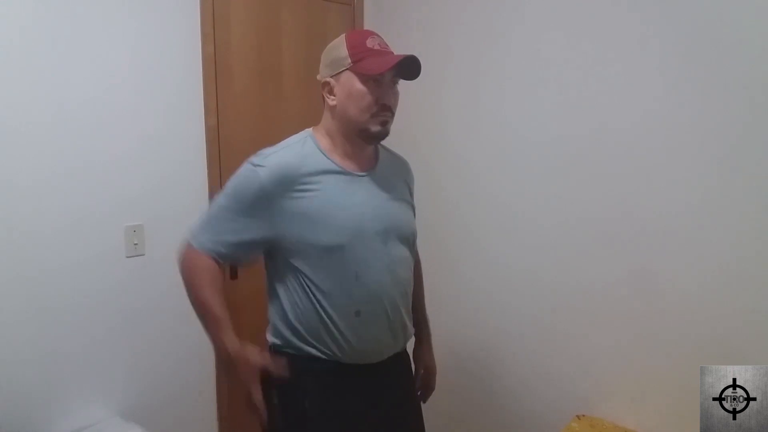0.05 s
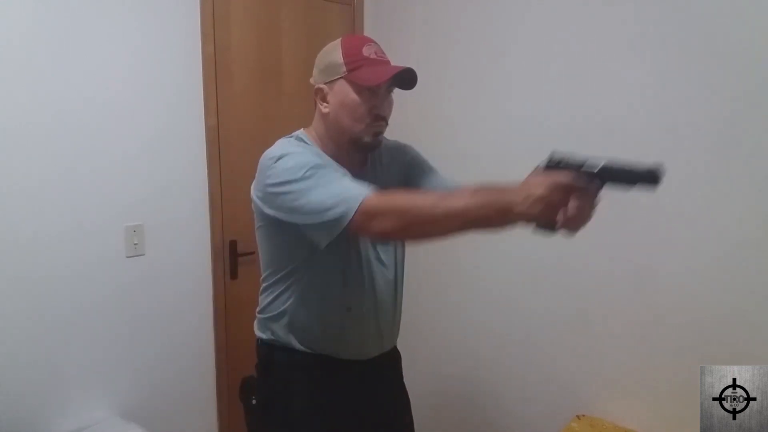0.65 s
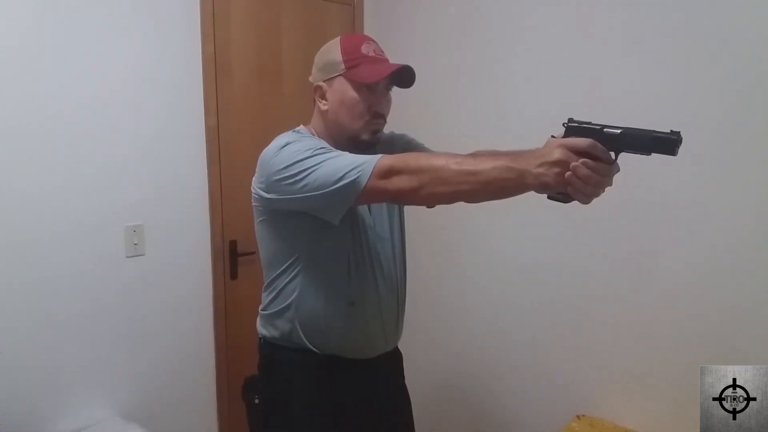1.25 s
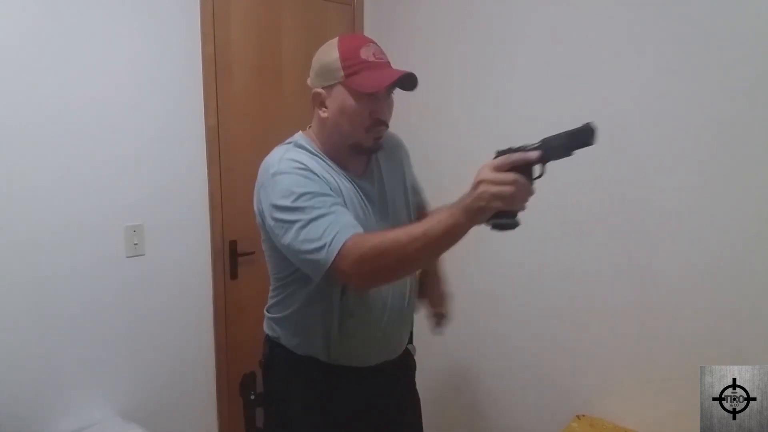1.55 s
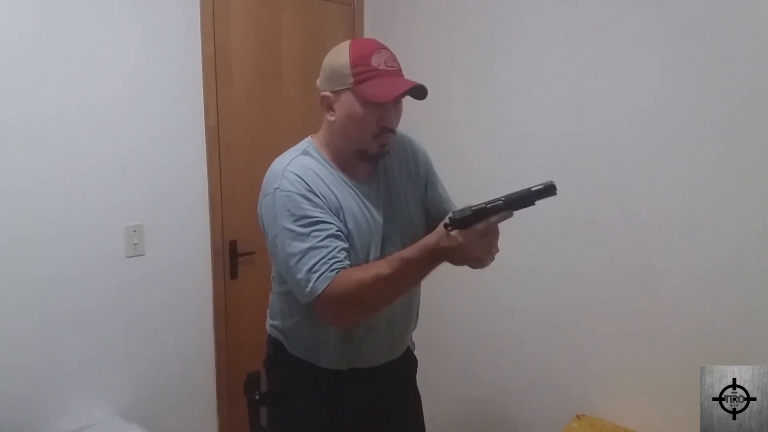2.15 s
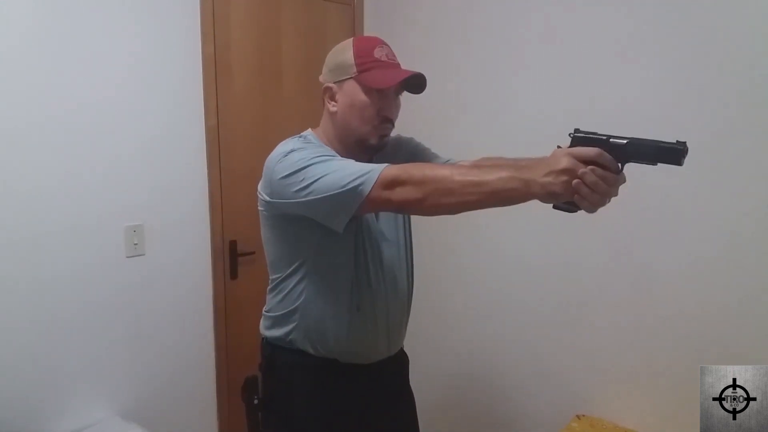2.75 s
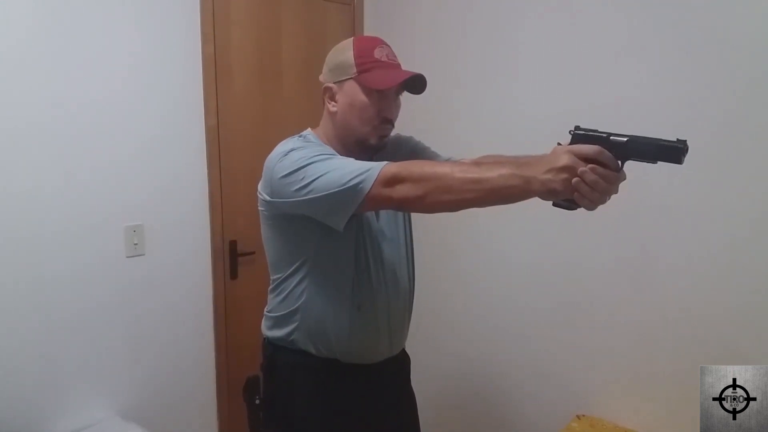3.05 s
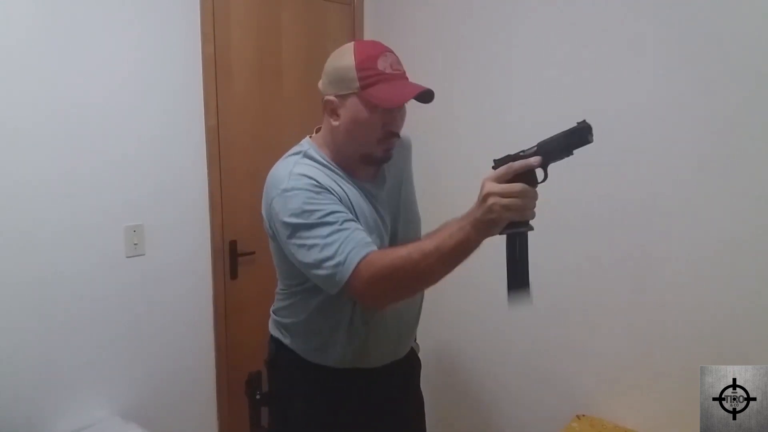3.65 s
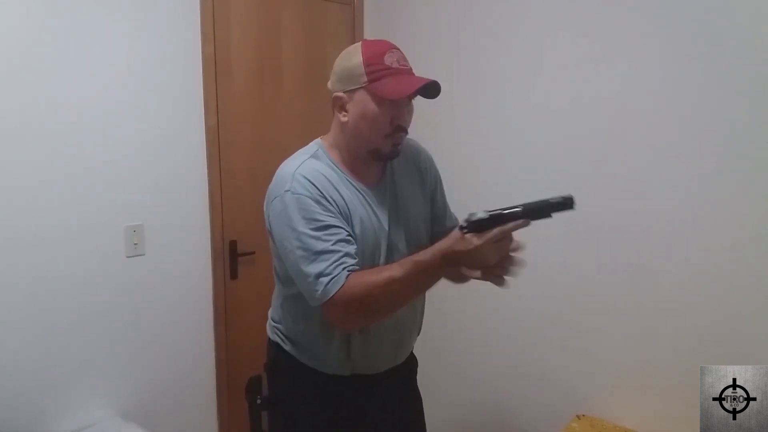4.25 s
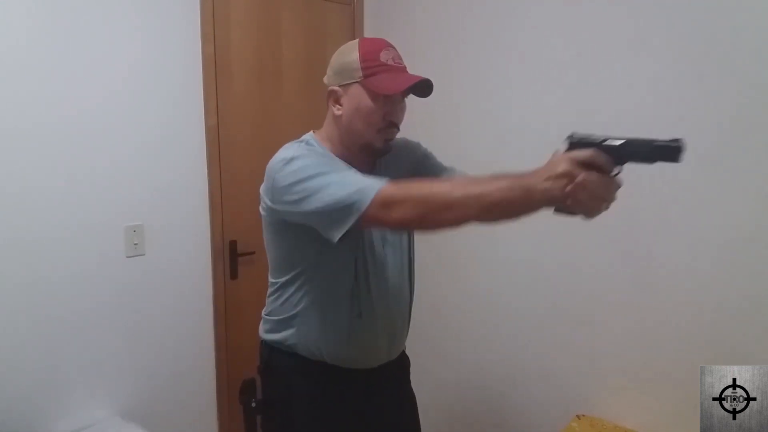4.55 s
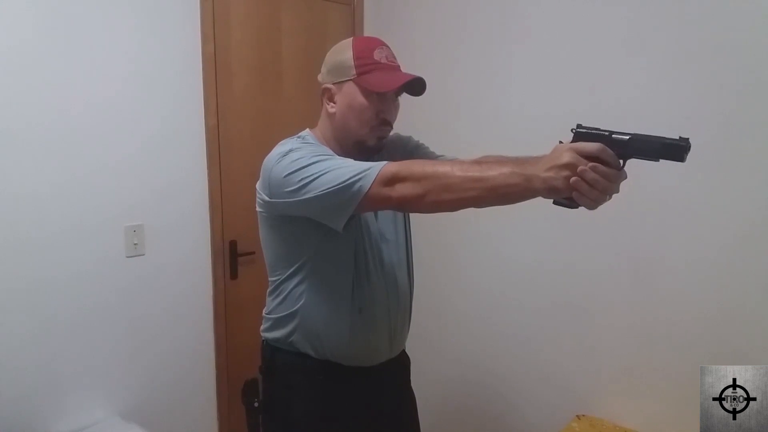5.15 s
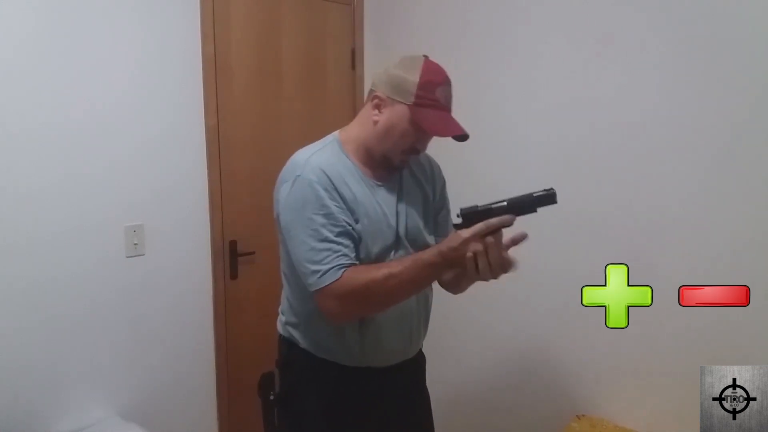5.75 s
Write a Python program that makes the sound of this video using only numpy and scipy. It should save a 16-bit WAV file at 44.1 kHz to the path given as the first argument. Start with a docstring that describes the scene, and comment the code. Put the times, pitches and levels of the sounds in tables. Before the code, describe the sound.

A pistol is drawn, clicks on an empty chamber and is reloaded twice with sharp metal clacks in a small room.

```python
"""Reload drills with an empty pistol in a small bare room. Over a wavering low hum that slowly fades,
cloth rustles, the pistol leaves its holster and the hammer snaps on an empty chamber. The catch clicks,
a fresh magazine is tugged from its pouch, the old one lands with a thump and a rattle, and the fresh one
scrapes in and is slapped home. A second reload follows, then one last sharp clack.
Every steel contact rings the struck part, a faint spring and the walls."""
import sys
import numpy as np
from scipy import signal
from scipy.fft import rfft, irfft, next_fast_len
from scipy.io import wavfile
from scipy.ndimage import map_coordinates

SR = 44100
rng = np.random.default_rng(int(sys.argv[2]) if len(sys.argv) > 2 else 0)


def persist_wave(psi):
    """Save psi, clipped to +-1, as 16-bit WAV."""
    counts = np.round(np.clip(psi, -1, 1) * 32767).astype(np.int16)
    wavfile.write(sys.argv[1], SR, np.atleast_2d(counts).T)


N = 256342

# Steel hits, levels relative within each layer: start_s, level_db, pitch_hz, heft_db, snap_db
HAMMER_HITS = [(1.138, -26.5, 4250, 0.5, 0)]  # the hammer falling
FRAME_HITS = [(0.153, -61, 3200, 1, -15), (0.298, -50, 3800, -2, -4), (0.333, -47, 900, -1.5, -2),
              (0.689, -71, 3320, 5, -7), (1.627, -55, 3600, 4.5, -12), (1.638, -40.5, 2340, -5, -12),
              (3.406, -77, 2030, -3.5, -10), (3.544, -60, 2100, -11.5, -17), (3.611, -36, 3080, -8.5, -6.5)]  # holster, grip and magazine catch
POUCH_HITS = [(1.82, -43.5, 2950, 3, -21.5), (1.881, -45.5, 4300, -3, -21.5),
              (3.795, -48, 2020, 5.5, -16.5), (3.818, -45.5, 3470, -1.5, -25)]  # a fresh magazine tugged free
DROP_HITS = [(2.012, -39.5, 1203, 0.5, -12), (2.021, -31.5, 2640, -2.5, -5.5), (2.037, -27.5, 3583, -2, 0),
             (2.132, -32, 3200, 6, -11.5), (2.144, -24.5, 1184, 4, -6), (3.982, -39.5, 2020, 5.5, -1.5),
             (3.996, -34, 3060, -11.5, -5), (4.013, -26.5, 3800, -3, 3), (4.05, -22, 2500, 5, -11)]  # the old one landing and bouncing
SEATING_HITS = [(2.27, -36.5, 1100, 1.5, -22), (2.29, -35, 1580, 2.5, -4.5), (2.303, -24, 3490, -8, -4),
                (2.315, -13.5, 1900, -12.5, -8.5), (2.332, -17.5, 1750, -11, -12),
                (2.375, -40, 1918, -3.5, -19), (4.194, -28, 3120, 2.5, -15), (4.21, -29.5, 2720, -30, -8),
                (4.298, -28.5, 2670, -0.5, -13), (4.339, -31, 950, 3, -13), (4.356, -25, 1710, 6, -7),
                (4.376, -22, 2900, -4, -2), (5.759, -21, 2300, -8, -13.5)]  # the fresh one going home, and the last clack
# Soft landings and palm blows: start_s, level_db
THUMP_HITS = [(2.003, -20.5), (2.124, -35.5), (2.369, -41.5), (3.99, -20.5), (4.353, -32), (4.386, -32.5)]
# Sustained movements: start_s, length_s, level_db
SCRAPE_STROKES = [(1.862, 0.018, -31), (2.15, .16, -32), (4.187, .205, -27.5)]  # a magazine along the pouch or up the grip
ARM_STROKES = [(0, 0.12, -64.5), (.19, 0.18, -57), (.5, 0.14, -59.5), (.7, 0.99, -66.5), (3.36, .55, -67.5),
               (5.26, 0.7, -72.5)]  # reach, draw, aim and reload
# Ring of each part: pitch_hz, width_hz, gain_db
SLIDE_MODES = [(875, 15, 0), (1400, 19, -1), (1712, 32, -12), (2494, 72, -1), (3120, 81, -6.5),
               (3680, 240, -8.5), (4200, 95, -8.5), (4850, 230, -10.5), (5480, 370, -10)]  # the slide under the hammer
FRAME_MODES = [(780, 120, -0.5), (1798, 66, 1), (2370, 115, -2.5), (3170, 23, -2), (3443, 52, -8.5),
               (4470, 41, -25)]  # the frame at the catch
MAGAZINE_MODES = [(921, 47, -7.5), (2020, 42, 0), (2330, 25, 3), (3210, 220, -5), (3800, 210, -4),
                  (4040, 41, -4.5), (4330, 39, -7), (4380, 47, -10)]  # a loose magazine
GRIP_MODES = [(664, 100, -2), (1680, 77, -7), (2135, 16, -8.5), (2484, 46, -2.5), (2760, 49, -11),
              (2984, 78, -8.5), (3550, 64, -6), (3420, 78, -7.5), (4700, 65, -20)]  # the grip with a magazine in it
# Tone curves: frequency_hz, gain_db
STEEL_EQ = [(60, -26.5), (200, 2.5), (450, 7.5), (750, 8), (1500, 7.5), (3000, 3.5), (4800, 3), (6000, -3),
            (7500, -15), (10000, -3.5), (13000, 0), (16000, -6)]  # steel on steel
BOOM_EQ = [(25, -36), (45, -5), (68, -5), (85, 3), (110, -7.5), (170, -11.5), (260, -23), (500, -26.5),
           (1200, -74.5)]  # the room's bass
AIR_EQ = [(15, -50), (25, -0.5), (38, -18.5), (70, -1.5), (137, -4), (166, -0.5), (195, -3.5), (416, -15.5),
          (463, -20.5), (545, -15), (1650, -24), (1940, -24), (2760, -26.5), (7110, -42), (16000, -31.5)]  # steady room tone
PAT_EQ = [(100, -12.5), (220, -6), (420, 7.5), (700, -20), (2000, -47)]
SCRAPE_EQ = [(100, -31.5), (450, -8), (850, 3.5), (1500, 0), (3200, 3), (5000, -12.5), (7700, -33),
             (12000, -22), (16000, -23.5)]
CLOTH_EQ = [(100, -20), (400, 3), (900, 1.5), (2100, 0), (4000, -10), (7000, -34), (16000, -30)]
BODY_EQ = [(35, -31), (65, 9), (110, -7), (300, -28), (1000, -85)]
MURK_EQ = [(30, -56.5), (60, -8), (150, -1), (230, -6.5), (400, -19), (1000, -51.5)]
# Reverb time of the bare walls: frequency_hz, t60_s
WALL_DECAY = [(100, .55), (500, .42), (1500, 0.41), (3500, 0.45), (6000, 0.4), (11000, 0.36), (16000, 0.26)]
# Tones of the hum: pitch_hz, gain_db
HUM_TONES = [(68, 3), (172, -1)]

CRACK_S, RATTLE_S = 0.0065, 0.013  # chatter decay of a locked part and of a loose one
FOCUS_DB, FOCUS_OCTAVES = 5, 0.36  # base lift and width of the bell around a hit's pitch
LIGHT_BELOW_DB, LIGHT_DB_PER_DB = -44, 0.33  # hits under this level get extra lift and sound more pitched


def hammer():
    """The hammer falls on an empty chamber and rings the slide."""
    return steel_hits(HAMMER_HITS, SLIDE_MODES, gain_db=27.5, knock_db=-12.5, ring_db=13, direct_db=-2,
                      rise_s=0.0011, clatter_s=CRACK_S, spring_hz=2620, spring_db=-27, spring_t60=0.97)


def frame_clicks():
    """Holster, hand and magazine catch click against the frame."""
    return steel_hits(FRAME_HITS, FRAME_MODES, gain_db=32.5, knock_db=-14.5, ring_db=10, direct_db=-3.5,
                      rise_s=0.0006, clatter_s=CRACK_S, spring_hz=2420, spring_db=-20, spring_t60=0.6)


def pouch_tugs():
    """A fresh magazine knocks lightly on its way out of the pouch."""
    return steel_hits(POUCH_HITS, MAGAZINE_MODES, gain_db=28, knock_db=0.5, ring_db=4, direct_db=-6,
                      rise_s=0.00055, clatter_s=RATTLE_S, spring_hz=2040, spring_db=-36, spring_t60=1.4)


def magazine_drops():
    """The dropped magazine lands, bounces and rattles."""
    return steel_hits(DROP_HITS, MAGAZINE_MODES, gain_db=27, knock_db=-15.5, ring_db=9.5, direct_db=-1.5,
                      rise_s=0.00062, clatter_s=RATTLE_S, spring_hz=2040, spring_db=-25, spring_t60=1.5)


def magazine_seating():
    """The fresh magazine meets the grip and clacks home."""
    return steel_hits(SEATING_HITS, GRIP_MODES, gain_db=25, knock_db=-11.5, ring_db=11, direct_db=-2,
                      rise_s=0.001682, clatter_s=CRACK_S, spring_hz=2540, spring_db=-30.5, spring_t60=0.8)


def steel_hits(hits, modes, gain_db, knock_db, ring_db, direct_db, rise_s, clatter_s,
               spring_hz, spring_db, spring_t60):
    """Each hit rings the part and the room; a spring inside sings on faintly."""
    track, t = np.zeros(N), np.arange(SR) / SR
    shared_tail = wall_reverb()
    for start_s, db, pitch_hz, heft_db, snap_db in hits:
        def colour(hz):
            strike = strike_db(hz, db, pitch_hz, heft_db, snap_db, knock_db)
            return minimum_phase(curve(STEEL_EQ, hz) + strike + resonance_db(modes, hz, ring_db))
        # the part moves little between hits, so most of the reverb repeats
        tail = 0.8 * shared_tail + 0.6 * wall_reverb()
        burst = impact(tail, direct_db, rise_s, clatter_s)
        add(track, start_s, amp(db + gain_db) * filtered(burst, colour))
        spring = amp(db + spring_db - 60 * t / spring_t60) * np.sin(2 * np.pi * spring_hz * t)
        add(track, start_s, spring)
    return track


def strike_db(hz, level_db, pitch_hz, heft_db, snap_db, knock_db):
    """A flat, heavy hit adds body, a hard edge adds snap, and the spot struck favours one pitch region."""
    weight = [(470, knock_db), (720, heft_db), (1100, heft_db), (1600, 0), (3800, 0), (10000, snap_db)]
    lift_db = FOCUS_DB + LIGHT_DB_PER_DB * max(LIGHT_BELOW_DB - level_db, 0)
    bell = np.exp(-(np.log2((hz + 1) / pitch_hz) / FOCUS_OCTAVES) ** 2)
    return curve(weight, hz) + lift_db * bell


def resonance_db(modes, hz, ring_db):
    """A part's modes stand as peaks over its broad response."""
    peaks = sum(amp(db + ring_db) ** 2 / (1 + ((hz - centre) / (width / 2)) ** 2)
                for centre, width, db in modes)
    return 10 * np.log10(1 + peaks)


def impact(tail, direct_db, rise_s, clatter_s):
    """A few milliseconds of ragged steel clatter arrive dry, then the room."""
    t = np.arange(len(tail)) / SR
    attack = 1 - np.exp(-t / rise_s)
    grit = amp(4 * map_coordinates(rng.standard_normal(len(t)), [t * 2000], order=1))
    clatter = rng.standard_normal(len(t)) * grit * np.exp(-t / clatter_s) * attack
    return tail * attack + amp(direct_db) * clatter / np.linalg.norm(clatter)


def thumps(bounce_hz, swell_s, boom_db, boom_rise_s, boom_t60, room_hz, room_db, room_t60,
           pat_db, pat_t60):
    """A soft surface pats, gives and swings a few times; the room booms, its lowest mode longest."""
    track, t = np.zeros(N), np.arange(SR * 3 // 2) / SR
    for start_s, db in THUMP_HITS:
        swing = np.sin(2 * np.pi * bounce_hz * t) * (t / swell_s * np.exp(1 - t / swell_s)) ** 5
        boom = noise(BOOM_EQ, len(t)) * amp(boom_db - 60 * t / boom_t60) * (1 - np.exp(-t / boom_rise_s))
        mode_envelope = amp(room_db - 60 * t / room_t60) * (1 - np.exp(-t / swell_s))
        room_mode = np.sin(2 * np.pi * room_hz * t) * mode_envelope
        pat = noise(PAT_EQ, len(t)) * amp(pat_db - 60 * t / pat_t60)
        add(track, start_s, amp(db) * (swing + boom + room_mode + pat))
    return track


def scrapes(gain_db, grain_db):
    """The magazine catches and slips along the walls of the pouch and the grip."""
    grain = unit(rng.standard_normal(N) * amp(grain_db * wobble(300)))
    slips = grain * amp(gain_db) * strokes(SCRAPE_STROKES, attack_s=0.0091, release_s=0.0051)
    colour = lambda hz: minimum_phase(curve(SCRAPE_EQ, hz) + resonance_db(MAGAZINE_MODES, hz, ring_db=-1))
    room = impact(wall_reverb(), direct_db=-15.5, rise_s=0.00026, clatter_s=0.0012)
    return signal.fftconvolve(filtered(slips, colour), room)[:N]


def shirt(rumble_db):
    """Cloth rustles as the arms move, with a low rumble from the shifting body."""
    effort = strokes(ARM_STROKES, attack_s=0.037, release_s=0.035)
    rumble = amp(rumble_db) * noise(BODY_EQ, N)
    folds = amp(2.5 * wobble(25))
    return effort * (noise(CLOTH_EQ, N) * folds + rumble)


def wall_reverb():
    """The dense tail of close bare walls; each frequency dies at its own speed."""
    hz, frame_s, spectrum = signal.stft(rng.standard_normal(SR * 3 // 4), SR, nperseg=256)
    decay = amp(-60 * frame_s / curve(WALL_DECAY, hz)[:, None])
    tail = signal.istft(spectrum * decay, SR, nperseg=256)[1]
    return tail / np.linalg.norm(tail)


def hum(start_db, fade_db_per_s, rest_db, murk_db):
    """Two wavering low tones in a murky rumble fade to a faint bed."""
    tones = 0
    for hz, db in HUM_TONES:
        waver = amp(db + 2 * wobble(8))
        pitch_hz = hz + 1.5 * wobble(9)
        tones += waver * np.sin(2 * np.pi * np.cumsum(pitch_hz) / SR)
    fader = np.hypot(amp(start_db - fade_db_per_s * np.arange(N) / SR), amp(rest_db))
    return fader * (tones + amp(murk_db) * noise(MURK_EQ, N))


def room_tone(level_db):
    """Faint steady hiss with a soft low end."""
    return amp(level_db) * noise(AIR_EQ, N)


def strokes(rows, attack_s, release_s):
    """Envelope of movements: each rises, holds and dies away."""
    t = np.arange(N) / SR
    return sum(amp(db) * np.clip((t - start_s) / attack_s, 0, 1)
               * np.exp(-np.maximum(t - start_s - length_s, 0) / release_s)
               for start_s, length_s, db in rows)


def amp(db):
    """Decibels to gain."""
    return 10 ** (np.asarray(db) / 20)


def unit(x):
    """x at rms 1."""
    return x / np.sqrt(np.mean(x ** 2) + 1e-20)


def curve(points, hz):
    """Breakpoints read on a log frequency axis."""
    point_hz, values = np.transpose(points)
    return np.interp(np.log(hz + 1), np.log(point_hz + 1), values)


def wobble(rate):
    """Smooth random modulation, rate knots a second."""
    return map_coordinates(rng.standard_normal(int(N * rate / SR) + 4), [np.arange(N) * rate / SR])


def filtered(x, response):
    """x through a frequency response."""
    size = 2 * next_fast_len(len(x) // 2 + 4096)
    return irfft(rfft(x, size) * response(np.fft.rfftfreq(size, 1 / SR)), size)[:len(x)]


def minimum_phase(db):
    """An EQ with these gains and no pre-ring ahead of the hit."""
    cepstrum = irfft(np.log(amp(db)))
    half = len(cepstrum) // 2
    return np.exp(rfft(np.r_[cepstrum[0], 2 * cepstrum[1:half], np.zeros(half)]))


def noise(eq, size):
    """Coloured noise of rms 1."""
    return unit(filtered(rng.standard_normal(size), lambda hz: amp(curve(eq, hz))))


def add(track, start_s, sound):
    """Mix a sound into the track at start_s."""
    part = track[max(round(start_s * SR), 0):]
    part[:len(sound)] += sound[:len(part)]


def scene():
    """The mono mix: steel up front, thumps and handling under it, the room's bed behind."""
    steel = hammer() + frame_clicks() + pouch_tugs() + magazine_drops() + magazine_seating()
    bass = thumps(bounce_hz=64.46, swell_s=0.055, boom_db=-2.5, boom_rise_s=0.012, boom_t60=0.63,
                  room_hz=67, room_db=-15, room_t60=1.7, pat_db=-13, pat_t60=0.151)
    handling = scrapes(gain_db=-1.5, grain_db=6) + shirt(rumble_db=2.5)
    bed = hum(start_db=-48, fade_db_per_s=7, rest_db=-76, murk_db=-0.5) + room_tone(level_db=-59)
    return (steel + bass + handling + bed)[None]


def record(dry):
    """The microphone loses the deepest bass, soft-clips the peaks and cuts off the very top."""
    low_cut_hz, ceiling, top_hz = 40, 0.46, 16150
    thinned = signal.sosfilt(signal.butter(4, low_cut_hz, "highpass", fs=SR, output="sos"), dry[0])
    rounded = thinned / (1 + np.abs(thinned / ceiling) ** 6) ** (1 / 6)
    return filtered(rounded, lambda hz: 1 / np.sqrt(1 + (hz / top_hz) ** 160))[None]


dry = scene()
out = record(dry)
persist_wave(out)
```